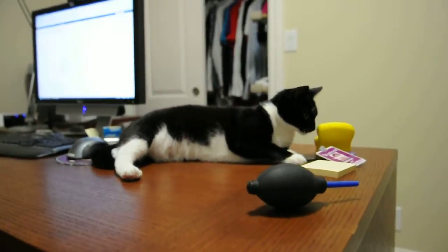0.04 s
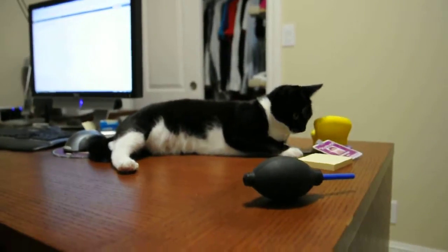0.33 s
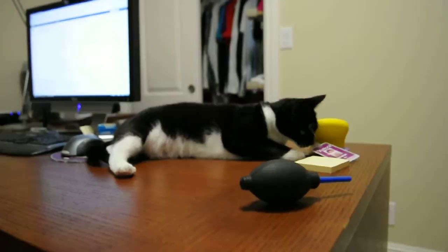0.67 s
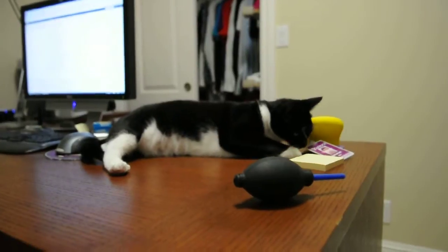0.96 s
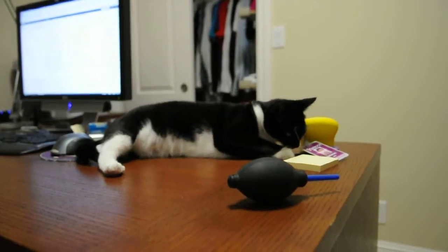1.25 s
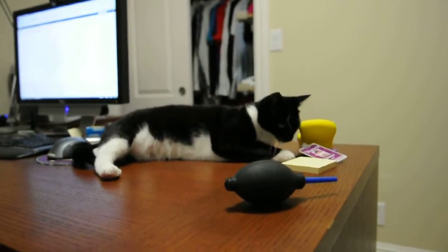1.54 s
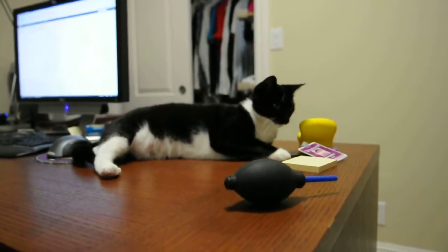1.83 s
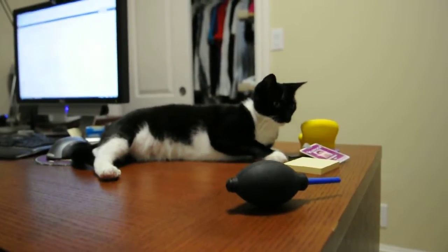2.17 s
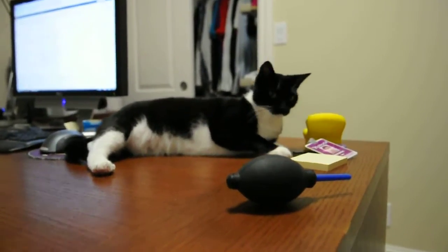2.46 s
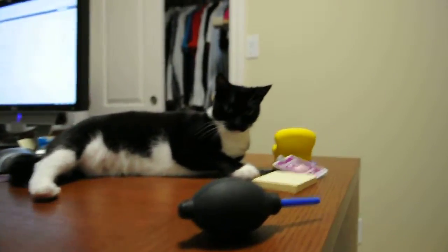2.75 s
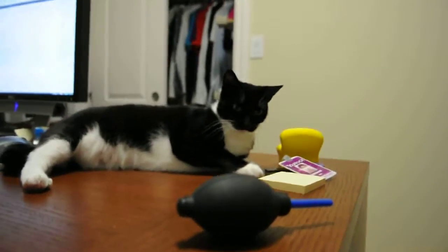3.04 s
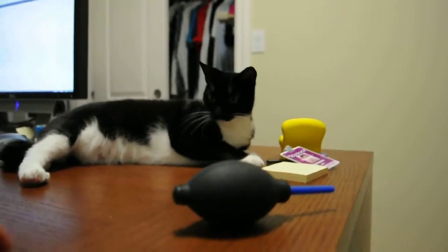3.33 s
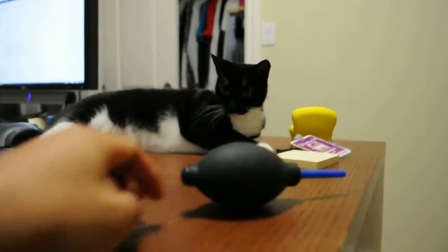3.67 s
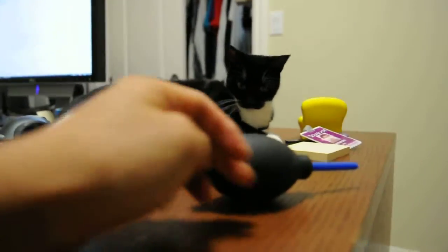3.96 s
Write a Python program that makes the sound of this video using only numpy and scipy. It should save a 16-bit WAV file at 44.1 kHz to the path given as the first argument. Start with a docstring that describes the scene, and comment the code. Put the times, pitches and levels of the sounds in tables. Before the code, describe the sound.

Close handling noise from a hand-held camera: scattered dull plastic knocks, then snaps and a loud click, with light finger rubbing. A hand then brushes briefly across a wooden desk, over faint, steady room noise.

```python
"""Dull plastic knocks come first: the housing of a hand-held camera creaks in the grip, in a quiet room.
Brighter snaps and sharp double clicks follow, each a blow that rings the case for a few milliseconds.
Fingers brush the plastic, and near the end a hand slides over a desk, sounding the wood in tiny slips.
Steady room noise and hiss lie below; a dull microphone overloads on the loudest click."""
import sys
import numpy as np
from scipy import signal
from scipy.fft import rfft, irfft
from scipy.io import wavfile
from scipy.ndimage import uniform_filter1d

SR = 44100
rng = np.random.default_rng(int(sys.argv[2]) if len(sys.argv) > 2 else 0)


def materialize(psi):
    """Save the field psi as 16-bit PCM at rate SR to the path in sys.argv[1].

    A 1-D psi becomes a single channel; in a 2-D psi each row is a channel.
    """
    bounded = np.clip(np.atleast_2d(psi).T, -1, 1)
    quanta = np.round(bounded * 32767).astype(np.int16)
    wavfile.write(sys.argv[1], SR, quanta)


N = 176400


def amp(db):
    """Decibels to gain."""
    return 10 ** (np.asarray(db) / 20)


def unit(x):
    """Scales to rms 1."""
    return x / np.sqrt(np.mean(x ** 2) + 1e-20)


def curve_at(points, hz):
    """Reads a curve on a log-frequency axis."""
    f, value = np.transpose(points)
    return np.interp(np.log(hz + 1), np.log(f + 1), value)


def add(mix, s, sound):
    """Mixes a sound in at s seconds."""
    part = mix[round(s * SR):][:len(sound)]
    part += sound[:len(part)]


def eq(x, gain):
    """Filters by a gain given as a function of frequency."""
    return irfft(rfft(x) * gain(np.fft.rfftfreq(len(x), 1 / SR)), len(x))


def strike(modes, db, bass_db, treble_db, pitch, bass_hz=614, treble_hz=1900):
    """One blow on damped plastic: broad modes swell and die; shelves make the contact soft or hard."""
    t = np.arange(SR // 20) / SR
    hz, width, level = np.transpose(modes)[:, :, None]
    bass_shelf = bass_db / (1 + (hz / bass_hz) ** 6)
    treble_shelf = treble_db / (1 + (treble_hz / hz) ** 6)
    gain = amp(db + level + bass_shelf + treble_shelf)
    polarity = (-1) ** np.arange(len(modes))[:, None]
    damping = np.pi * width
    envelope = 2 * damping ** 2 * t / SR * np.exp(-damping * t)
    return (polarity * gain * envelope * np.sin(2 * np.pi * hz * pitch * t)).sum(0)


# click cues (t/s, level/dB, bass/dB, treble/dB, pitch ratio)
CLICK_CUES = [(2.8419, 11, 16, -1.5, 0.95), (3.0149, 31, 1, -2, 0.99), (3.3488, 14, 12, 0, 0.96),
              (3.8665, -10, 35.5, -7, 0.96), (3.906, -26, 10, 8, 0.95), (3.9431, 6.5, 17.5, -13.5, 0.95)]
# modes of a click at pitch ratio 1 (f/Hz, width/Hz, level/dB)
CLICK_MODES = [(388, 100, -24.5), (1220, 310, -30), (1630, 193, -7), (2353, 220, 4), (2919, 205, 0),
               (3572, 405, -4), (4340, 300, -25.5), (5360, 500, -30)]
def clicks(gap_s=.00155, second_treble_db=-11.5):
    """A control strikes twice in one sharp click, the second hit duller."""
    out = np.zeros(N)
    for s, db, bass_db, treble_db, pitch in CLICK_CUES:
        add(out, s, strike(CLICK_MODES, db, bass_db, treble_db, pitch))
        add(out, s + gap_s, strike(CLICK_MODES, db, bass_db, treble_db + second_treble_db, pitch))
    return out


# cues for knocks and snaps (t/s, level/dB, bass/dB, treble/dB, pitch ratio)
KNOCK_CUES = [(0.1255, -11.5, 16.5, -1, 0.81), (0.1353, -10, -2, -2, 1.1), (0.1487, -2, 6.5, 8.5, 0.97),
              (0.5209, -19, 1, 18, 0.99), (0.6088, -4.5, -16, 4.5, 1.03), (0.7369, -6.5, -8, 2, 1.01),
              (1.0159, -9, 0, 14.5, 0.87), (1.0237, -6, -7, 14.5, 0.75), (1.1288, -2.5, -6, 8, 0.94),
              (1.1315, -7, -11, 16.5, 1.06), (1.1487, -11, -8, 4, 0.99), (1.1664, -9, 15, 4, 1.26),
              (1.1772, 9.5, -15, -1, 1), (1.1797, 3, -12, 21, 0.83), (1.1859, 2.5, 4.5, 3, 1.13),
              (1.1895, 0, -6, -2, 1), (1.4329, -9, 11, 0, 1.02), (1.4402, -14.5, 19, 20, 1.02),
              (1.506, -13.5, 13.5, -3, 0.99), (1.5328, 19, -1.5, -6.5, 1.032), (1.546, 10, 7.5, -8.5, 0.97),
              (1.5553, 15, -1.5, -9, 1.05), (1.564, 13.5, -1, -3.5, 1.08), (1.5782, 14, 3.5, 0.5, 1.04),
              (1.6692, 9, 11, 0, 1.02), (1.9642, -17, 12, -5, 1.01), (2.1906, -16, 12, 1, 1.03),
              (2.4571, -7, 7, 9.5, 0.91), (2.5465, -5, 10, 16.5, 0.97), (3.868, -18, 22, 17, 0.86)]
SNAP_CUES = [(2.7167, -4.5, 2.5, 4.5, 0.97), (2.7481, -12, 19.5, 6, 0.85), (2.7693, 22, -17.5, -13.5, 1.06),
             (2.785, 20.5, 4, 4, 0.981), (2.7944, 7, 20.5, 7, 0.96)]
# their modes at pitch ratio 1 (f/Hz, width/Hz, level/dB)
KNOCK_MODES = [(255, 70, -20.5), (384.4, 184, -8.5), (794, 330, -13.5), (1194, 284, -0.5), (1660, 730, -20),
               (2140, 280, -16.5), (2480, 230, -23), (3140, 480, -23), (4590, 1000, -38)]
SNAP_MODES = [(260, 63, -21), (389, 58, -11.5), (737, 350, -15.5), (1219, 233, -9), (1660, 477, -13.5),
              (2152, 280, 0), (2537, 180, -12.5), (3160, 390, -13.5), (3850, 300, -26.5),
              (4550, 460, -22.5)]
def housing_creaks():
    """The housing gives in the hand: dull knocks, and brighter snaps as the grip shifts."""
    out = np.zeros(N)
    for cues, modes in (KNOCK_CUES, KNOCK_MODES), (SNAP_CUES, SNAP_MODES):
        for s, *blow in cues:
            add(out, s, strike(modes, *blow))
    return out


def case_ring(hits, send_db=-21, t60_s=.025):
    """The case rings on after each hit with a short, noisy tail."""
    t = np.arange(SR // 10) / SR
    tail = rng.standard_normal(len(t)) * t * amp(-60 * t / t60_s)
    return amp(send_db) * signal.fftconvolve(hits, tail / np.linalg.norm(tail))[:N]


def friction(n, grain_db, grain_samples):
    """Tiny slips of skin: noise with a grainy, flickering level."""
    noise = rng.standard_normal(n)
    flicker = unit(uniform_filter1d(rng.standard_normal(n), size=grain_samples))
    return noise * amp(grain_db * flicker)


# brush cues (t/s, length/s, level/dB, centre f/Hz, width/octaves)
BRUSH_CUES = [(1.02, 0.058, -50.5, 1060, 0.9), (1.173, 0.044, -52.5, 1800, 1.1),
              (1.426, 0.11, -57, 900, 1.5), (2.175, 0.095, -60.5, 1100, 1.3),
              (2.516, 0.37, -63.5, 2000, 1.3), (2.713, 0.22, -54.5, 2300, 0.58),
              (2.822, 0.024, -44, 2630, 0.55), (2.921, 0.084, -58.5, 2800, 0.47),
              (3.018, .06, -53.5, 2400, .5), (3.201, .1, -58, 1770, 1.2), (3.266, 0.14, -54, 2000, 2),
              (3.296, 0.013, -52, 5200, .2), (3.86, 0.18, -61.5, 700, 1.6)]
def finger_brushes(attack_share=0.072, fade_db=-14):
    """Skin rubs the housing: soft bands of friction that swell quickly and fade."""
    out = np.zeros(N)
    for s, length, db, hz, octaves in BRUSH_CUES:
        grains = friction(SR // 2, grain_db=3, grain_samples=60)
        rub = eq(grains, lambda f: np.exp(-.5 * (np.log2((f + 1) / hz) / octaves) ** 2)
                 / np.sqrt(1 + f / hz))
        progress = np.linspace(0, 1, min(int(length * SR), len(rub)))
        gate = np.minimum(progress / attack_share, 1) * np.minimum(10 * (1 - progress), 1)
        add(out, s, unit(rub)[:len(gate)] * gate * amp(db + fade_db * progress ** 2))
    return out


# fader moves of the slide's three bands (t/s, bass/dB, middle/dB, hiss/dB)
SLIDE_FADERS = [(3.37, -60, -61, -70), (3.393, -59, -59, -68), (3.397, -51.5, -49, -50),
                (3.429, -45.5, -50, -51), (3.47, -52, -55.5, -55.5), (3.51, -52, -54.5, -55),
                (3.575, -57, -51.5, -55.5), (3.63, -59.5, -57.5, -58), (3.675, -60.5, -60, -62),
                (3.74, -76, -70, -67.5)]
# tone of skin on wood, ahead of the band split (f/Hz, level/dB)
SLIDE_EQ = [(100, -31), (230, -9), (350, -6), (430, 1), (510, -7.5), (610, -6), (700, -3), (860, -15.5),
            (1000, -8), (1320, -10), (1600, -15.5), (3600, -16.5), (5000, -24.5), (6000, -29.5)]
def hand_slide(crossovers_hz=(600, 1600)):
    """Skin drags over the desk: slips sound the wood, deep at first, then lighter, with hiss above."""
    t = np.arange(N) / SR
    times, *faders = np.transpose(SLIDE_FADERS)
    slips = friction(N, grain_db=1.2, grain_samples=120)
    rub = eq(slips, lambda f: amp(curve_at(SLIDE_EQ, f)))
    bass, body = (eq(rub, lambda f: 1 / (1 + (f / hz) ** 10)) for hz in crossovers_hz)
    bands = bass, body - bass, rub - body
    gains = (amp(np.interp(t, times, db, left=-120, right=-120)) for db in faders)
    return sum(unit(band) * gain for band, gain in zip(bands, gains))


# tone of the reverb return (f/Hz, level/dB)
REVERB_EQ = [(100, -18.5), (380, -13.5), (800, -21.5), (1300, -25), (2400, -32.5), (5000, -32.5)]
# reverb decay (f/Hz, t60/s)
REVERB_DECAY = [(200, .25), (1000, 0.18), (5000, .18)]
def room_reverb(x, build_s=0.0069):
    """Faint reflections of a small furnished room; the lows linger longest."""
    hz, t, spectrum = signal.stft(rng.standard_normal(SR // 2), SR, nperseg=256)
    decay = amp(-60 * t / curve_at(REVERB_DECAY, hz)[:, None])
    tail = signal.istft(spectrum * np.minimum(t / build_s, 1) * decay, SR, nperseg=256)[1]
    wet = signal.fftconvolve(x, tail / np.linalg.norm(tail))[:N]
    return eq(wet, lambda f: amp(curve_at(REVERB_EQ, f)))


# colour of the room tone (f/Hz, level/dB)
ROOM_TONE_EQ = [(20, -15), (35, -11), (60, -8.5), (100, 0), (150, -2.5), (220, 0), (300, 0.5), (420, 0),
                (600, -2.5), (850, -4.5), (1200, -7.5), (1800, -11), (2600, -13), (3600, -14.5),
                (4500, -15.5), (5200, -19.5)]
def room_tone(level_db=-59.5, waver_db=0.32, waver_hz=6):
    """A steady, faintly wavering bed of air and fan noise."""
    waver = unit(eq(rng.standard_normal(N), lambda f: 1 / (1 + (f / waver_hz) ** 4)))
    air = unit(eq(rng.standard_normal(N), lambda f: amp(curve_at(ROOM_TONE_EQ, f))))
    return amp(level_db + waver_db * waver) * air


def scene():
    """Handling sounds over room tone; only the hits feed the reverb."""
    hits = clicks() + housing_creaks()
    hits += case_ring(hits)
    return (hits + room_reverb(hits) + finger_brushes() + hand_slide() + room_tone())[None]


def record(dry):
    """A dull microphone that overloads on the loudest click, with faint hiss and a band limit."""
    mic_hz, ceiling, hiss_db, limit_hz = 5450, 0.81, -101, 16800
    splash_hz, splash_db = 6080, -14  # a high shelf damps the overload's treble
    dull = eq(dry[0], lambda f: 1 / np.sqrt(1 + (f / mic_hz) ** 36))
    overloaded = np.clip(dull, -ceiling, ceiling)
    damped = eq(overloaded, lambda f: np.maximum(1 / (1 + (f / splash_hz) ** 20), amp(splash_db)))
    hiss = amp(hiss_db) * rng.standard_normal(N)
    lowpass = signal.firwin(511, limit_hz, window=("kaiser", 9), fs=SR)
    return signal.oaconvolve(damped + hiss, lowpass, "same")[None]


dry = scene()
out = record(dry)
materialize(out)
```